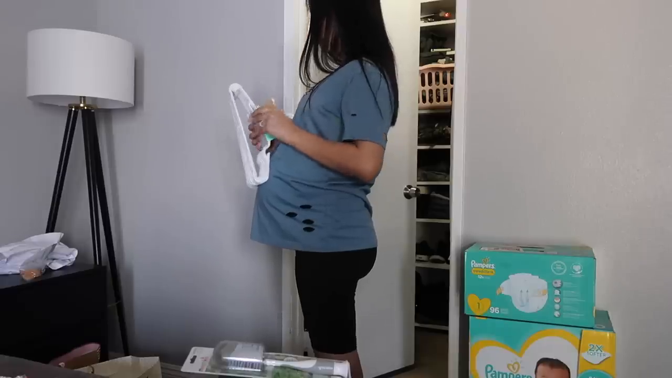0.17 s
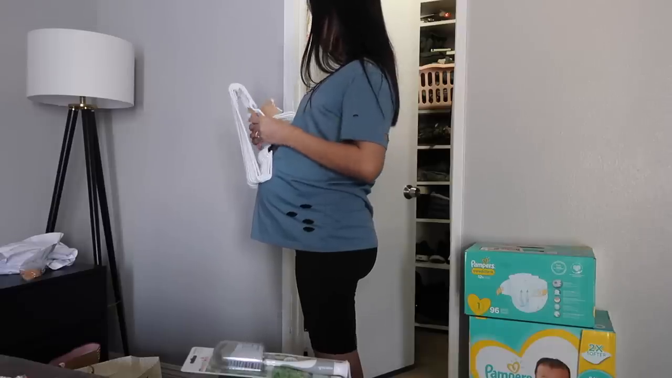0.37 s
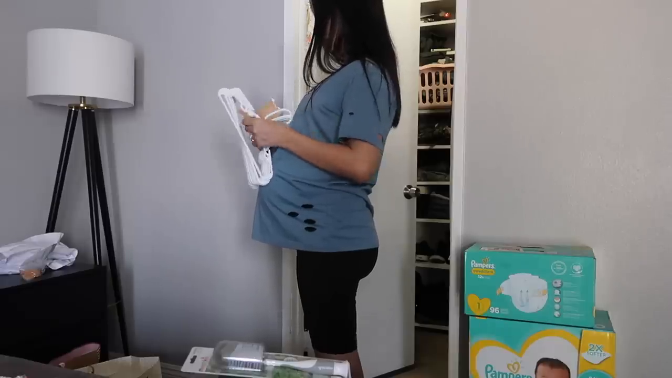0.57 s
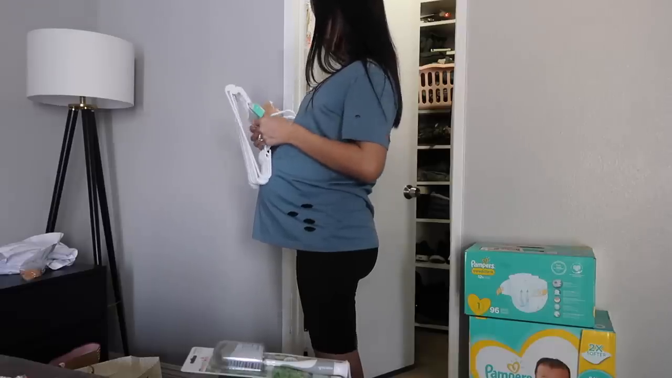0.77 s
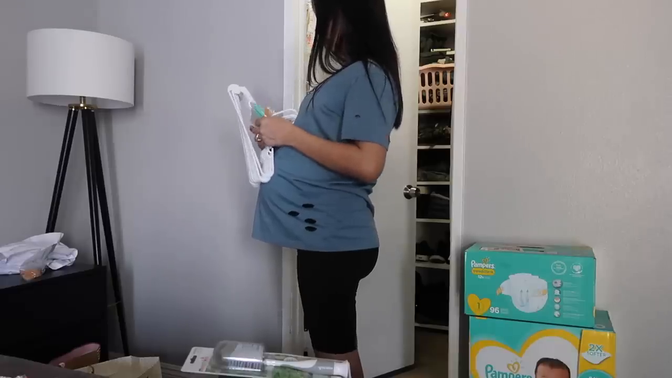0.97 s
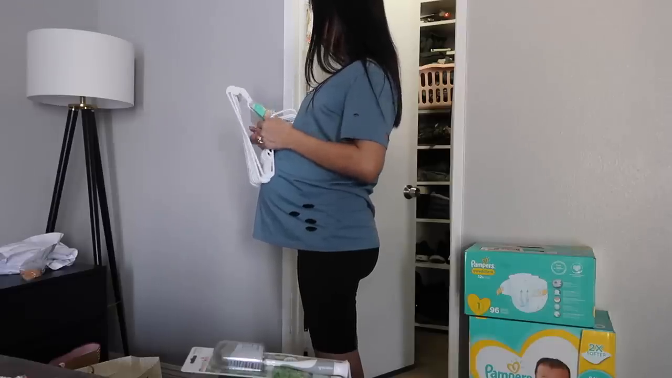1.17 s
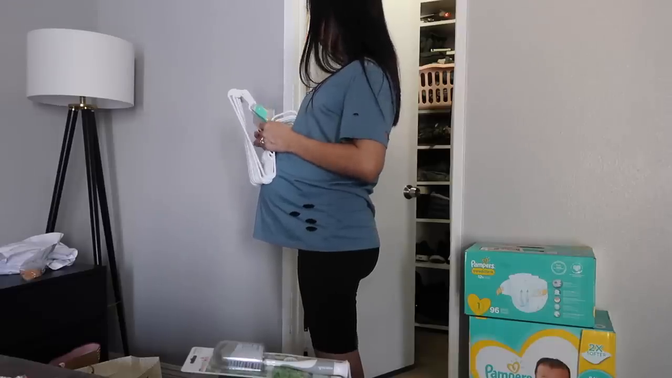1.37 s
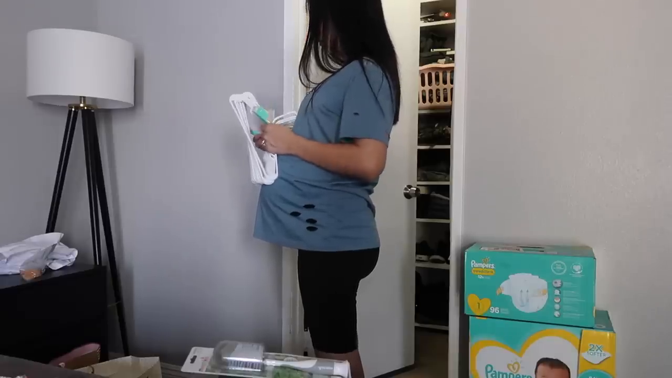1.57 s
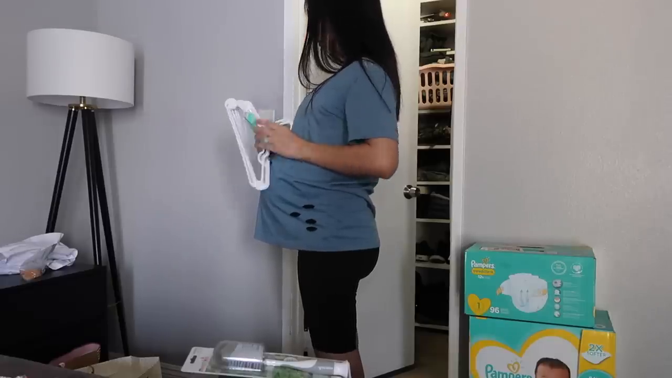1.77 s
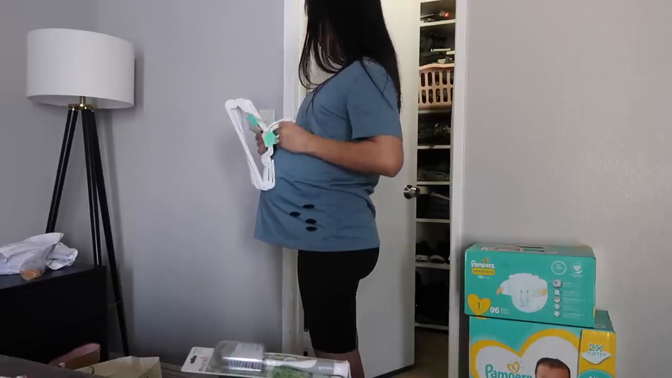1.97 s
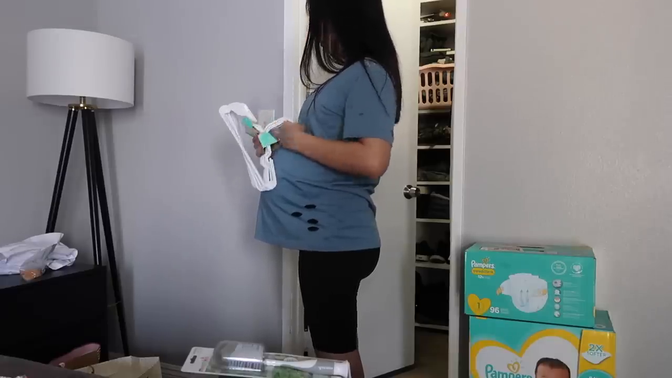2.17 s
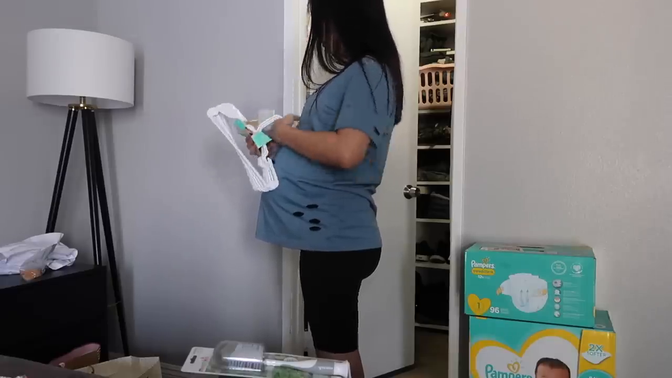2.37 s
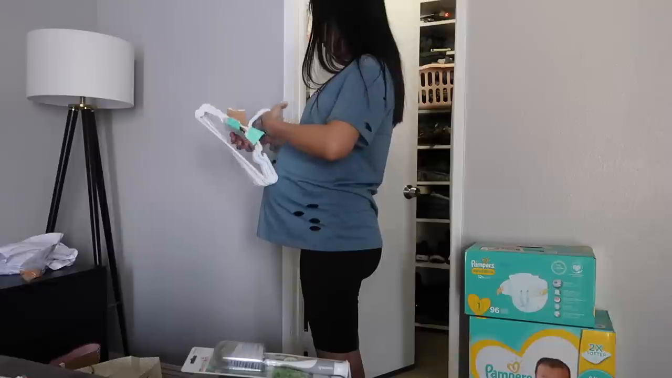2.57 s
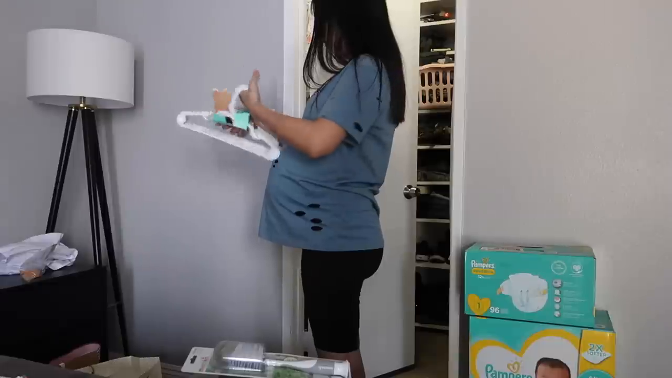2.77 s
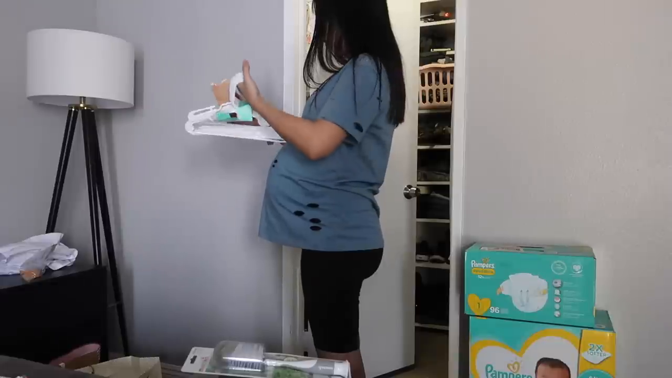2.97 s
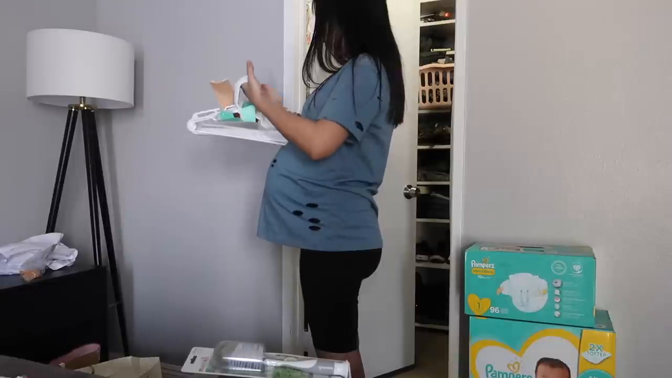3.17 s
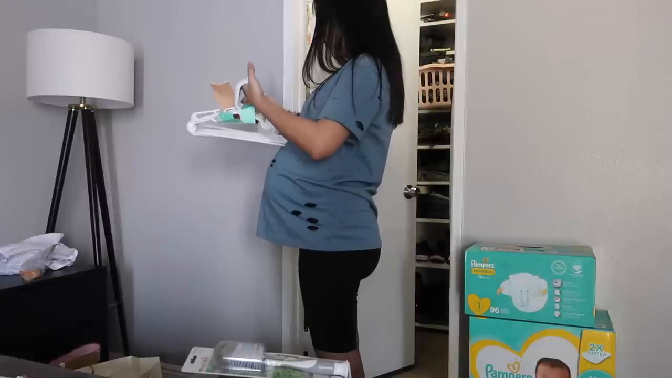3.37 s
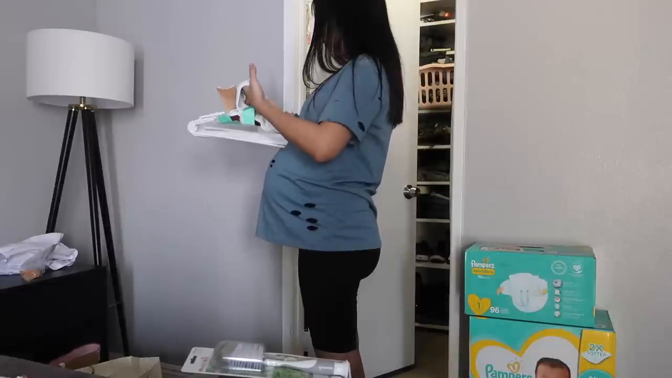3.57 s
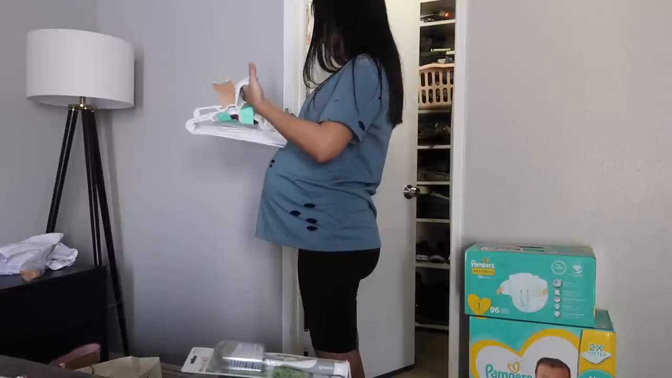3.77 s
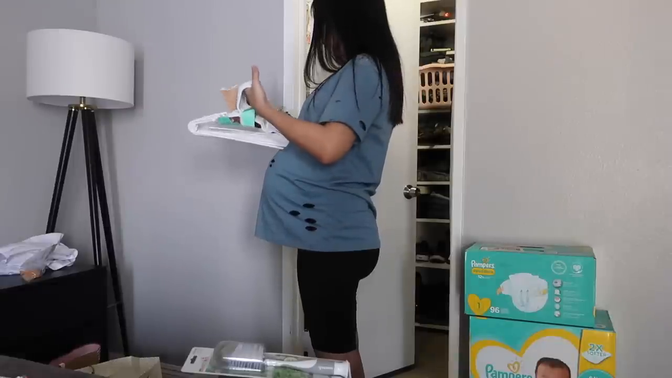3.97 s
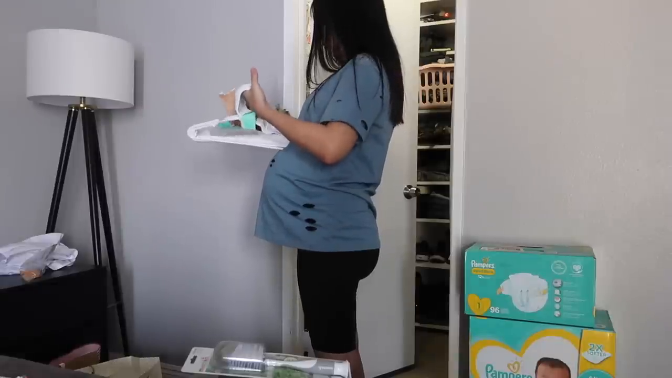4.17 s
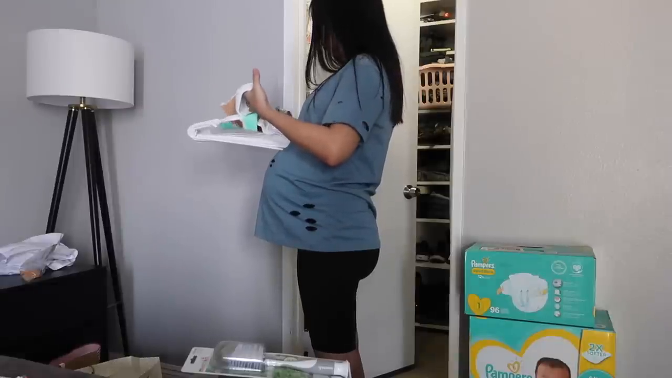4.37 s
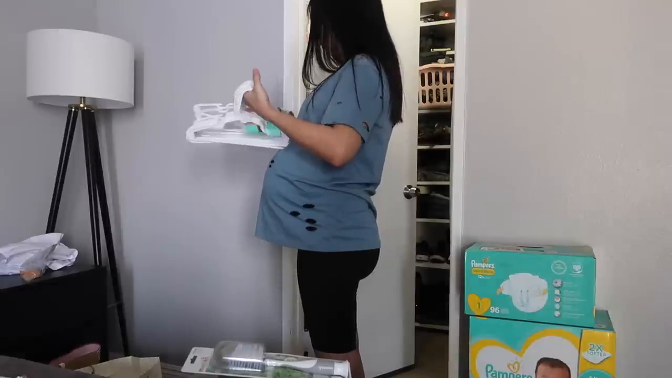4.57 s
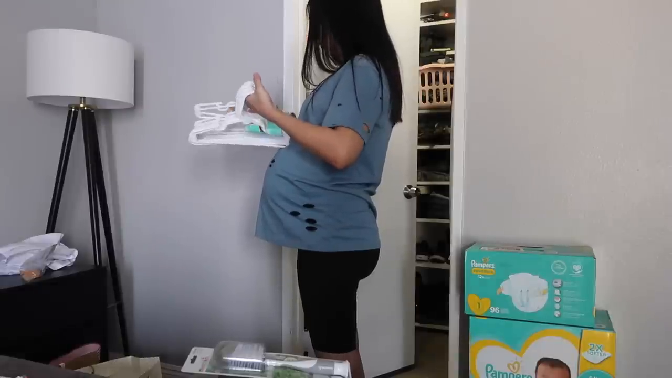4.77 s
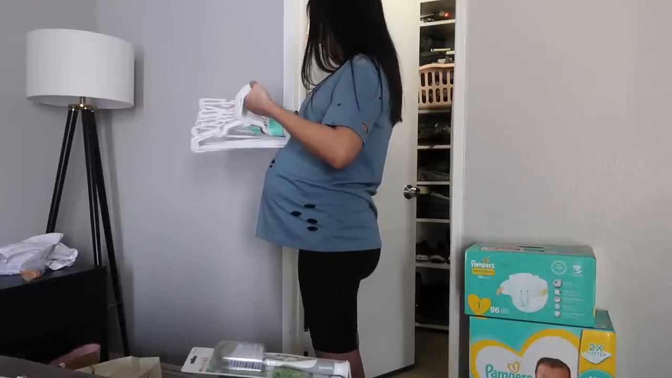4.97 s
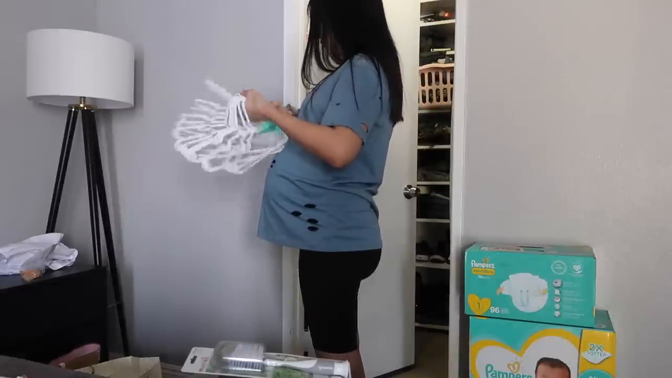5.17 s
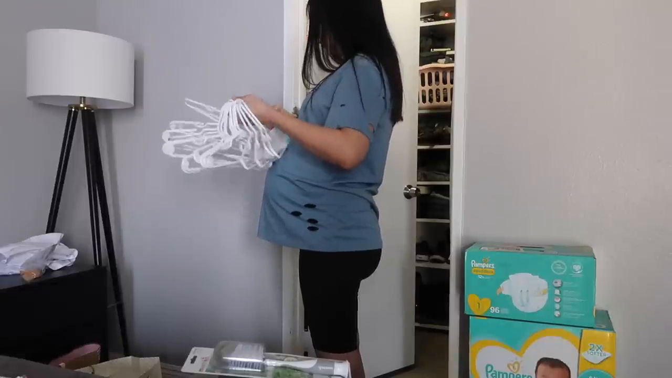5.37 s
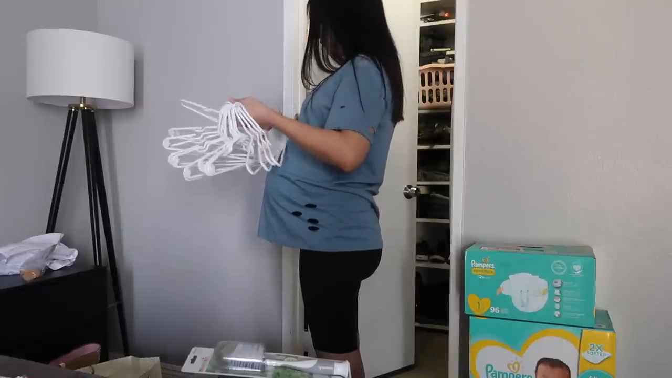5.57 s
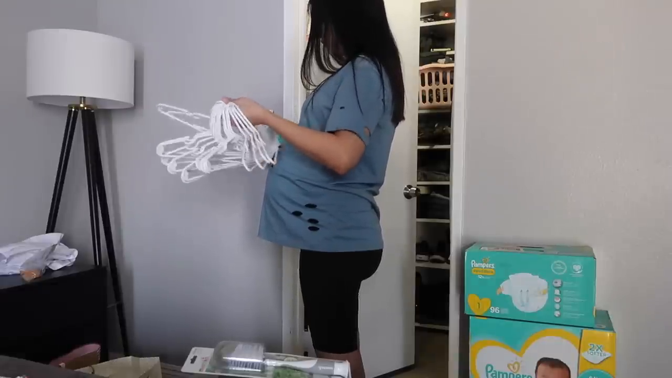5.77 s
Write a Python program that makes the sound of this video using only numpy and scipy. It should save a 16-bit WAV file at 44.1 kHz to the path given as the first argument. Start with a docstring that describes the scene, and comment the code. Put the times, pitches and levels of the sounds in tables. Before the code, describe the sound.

Plastic hangers knock together in short, bright, irregular clacks, with faint ticking and rubbing between them as hands shift the bundle. After two sharp clacks spaced apart, the hangers spill against each other in a brief clatter, the loudest moment. The sound comes from a few metres away in a room with little echo and a steady, low ventilation hum.

```python
"""Clattering plastic clothes hangers

A bundle of plastic hangers is handled a few metres away in a furnished room. Each knock sets
a hanger's frame ringing briefly; sliding makes a rattle of tiny ticks. At the end the bundle
fans out with a clatter. Ventilation rumbles below. Two close microphones hear the treble
mostly out of phase: one signal goes up as the other goes down."""
import sys
import numpy as np
from scipy import signal
from scipy.fft import rfft, irfft, next_fast_len
from scipy.io import wavfile

SR = 44100
rng = np.random.default_rng(int(sys.argv[2]) if len(sys.argv) > 2 else 0)


def wav_record(signal):
    """Record a signal, one row per channel, as 16-bit PCM in the file named by sys.argv[1]."""
    frames = np.transpose(np.atleast_2d(signal))
    bounded = np.clip(frames, -1, 1)
    # unit amplitude maps onto the largest positive 16-bit level
    quanta = np.round(bounded * 32767).astype(np.int16)
    wavfile.write(sys.argv[1], SR, quanta)


N = 256024

HANGER_TUNINGS = [.955, 1.0, 1.045]   # pitch ratios of three slightly unlike hangers
# The modes of a hanger, the tones its frame rings at: pitch_hz, level_db, ring_s (time to fade 60 dB)
HANGER_MODES = [(225, -14, 0.013), (312.5, -14, 0.022), (392, -15.5, 0.019), (497, -13.5, 0.03),
                (625, -16, 0.059), (785, -12.5, 0.038), (953, -6.5, 0.026), (1169, -6.5, 0.022),
                (1367, -8.5, 0.023), (1572, -1, 0.012), (1860, 1.5, 0.0099), (2208, -2, 0.016),
                (2546, 0.5, 0.012), (2970, -3.5, 0.017), (3310, 3.5, 0.0041), (3598, -7.5, 0.017),
                (4120, -2.5, 0.0078), (4660, -3.5, 0.0044), (5310, -3.5, 0.0033), (6110, -10, 0.0043),
                (6840, -13, 0.0047), (7850, -9, 0.0024), (9330, -12, 0.0015), (12100, -21, 0.0018),
                (13300, -35, 0.0031)]
# Knocks between hangers: start_s, level_db, pitch_hz, second_pitch_hz, bass_db, treble_db, contact_ms
KNOCKS = [(.128, -31.5, 1410, 620, 11, 0, 3), (0.148, -36, 2840, 3400, -7, 19.5, 2.1),
          (0.213, -33, 2270, 3420, 5, -13, 2.8), (0.241, -9, 2450, 5170, -4, 5.5, 3.85),
          (.252, -12, 2480, 3360, 3.5, 18.5, 4.04), (.266, -6, 2560, 4630, -16, 5.5, 5.85),
          (.281, -27, 2330, 3680, 6, -2, 9.4), (0.297, -16, 2350, 3560, -8, 10, 4),
          (0.497, -34, 3120, 2200, -1, 13, 10.5), (0.575, -32, 2010, 3420, 10, -22, 5),
          (0.704, -29, 2400, 1240, 10.5, 15, 9.8), (0.894, -42, 3200, 3560, 10, 12, 1.06),
          (.954, -29, 2320, 4160, -2, 9, 11.6), (1.035, -36, 1700, 2500, 10.5, 5, 6),
          (1.076, -42, 3620, 4400, -7, 5, 2), (1.111, -43, 2900, 3900, -5, 5, 8),
          (1.178, -39, 2700, 3600, -5, 3, 6), (1.263, -37, 2880, 3860, -10, -5, 6),
          (1.307, -43, 3160, 3360, 6, 7, 6), (1.423, -31, 2700, 3600, -2, 1, 14),
          (1.453, -20, 2510, 3800, -20, 14, 16.7), (1.474, -20, 2530, 2900, -15, 8, 18),
          (1.506, -19.5, 2500, 1900, 4, 9, 5.5), (1.698, -37, 2500, 4290, -4, 7, 8.9),
          (1.734, -29.5, 2740, 4070, 3, 9, 8), (1.776, -30.5, 2830, 3840, 8, 21, 9.5),
          (1.81, -26, 2850, 4260, -21, -1, 3.2), (1.826, -19, 2880, 3600, 0, 14.5, 9.1),
          (1.869, -39, 1830, 7750, 22.5, 36.5, 6.3), (2.118, -41, 2680, 3600, -10, -8, 4.6),
          (2.207, -28.5, 2650, 3570, -6, -1, 2.9), (2.225, -41, 2110, 3620, -12, -5, 8),
          (2.294, -35.5, 2270, 3920, 7, 5, 3.6), (2.36, -34.5, 2670, 3940, -8, 8, 8.2),
          (2.419, -32, 1650, 4180, -16, 6, 7), (2.471, -30.5, 2600, 3650, -15, 3, 3.9),
          (2.616, -38.5, 2450, 3470, 1, 15, 5), (2.746, -35, 2300, 4100, 4, -2, 4.4),
          (2.878, -32, 2350, 3280, -2, 17.5, 6), (2.933, -38, 4470, 5600, -7, 24, 0.84),
          (2.985, -25, 2310, 2300, -12, -8, 2.1), (2.996, -8.5, 2220, 2230, 10.5, -5, 2.83),
          (3.003, -10.5, 1680, 393, 2.5, -24, 7), (3.069, -25.5, 2570, 2600, -15, 6, 11),
          (3.364, -32.5, 2380, 3200, -11, -4, 0.96), (3.379, -33, 2300, 3470, -6, 17, 4),
          (3.412, -35.5, 2400, 4280, 13, 20, 1.13), (3.434, -34, 2300, 3500, 7.5, 16, 5),
          (3.56, -30, 1780, 3330, -12, 7, 5.6), (3.634, -26.5, 2190, 780, 6, 0, 3.25),
          (3.723, -32, 2230, 3900, -12, 13, 4.9), (3.769, -24, 2580, 3380, -19, -7, 5),
          (3.776, -18.5, 2670, 4250, 6, -1, 1.46), (3.848, -41, 2630, 5700, 8, 29.5, 1.55),
          (3.944, -29.5, 2730, 3460, -12, -3, 5), (3.981, -33, 2300, 4140, 8.5, 4, 4.4),
          (4.045, -38, 2350, 3000, -12, 14, 3.6), (4.1, -38.5, 2460, 2450, -15, -8, 10.4),
          (4.15, -44, 2600, 2600, -12, -5, 8), (4.18, -32, 2360, 3550, -5, 5, 9),
          (4.229, -28, 1220, 4240, 2, -24, 5.5), (4.282, -36, 2450, 3670, 0, 24.5, 4.1),
          (4.397, -39, 1980, 3530, 10, 15, 5.6), (4.49, -23, 2090, 3520, -10, 7, 6),
          (4.578, -25, 3100, 3100, -10, -5, 9.6), (4.594, -15, 2530, 2480, -2, -13, 6),
          (4.6042, -1, 1460, 3950, 0, -6, .5), (4.6049, -3, 4130, 2530, -2, -16, 0.37),
          (4.643, -21, 1570, 4080, -1, 20.5, 6.8), (4.675, -18, 1450, 6860, -4, 14, 5),
          (4.739, -26.5, 1580, 6960, -7, 20, 6), (4.815, -35, 3020, 4200, -15, 19, 4),
          (4.828, -20.5, 2620, 4330, -40, 11.5, 2.3), (4.973, -25.5, 2460, 3870, -3, 8, 3.9),
          (5.042, -20, 2450, 7000, 11, 6, 7.1), (5.051, -16, 1900, 3600, 7.5, -12, 14),
          (5.158, -13, 2600, 3450, 9, 13, 6.2), (5.169, 1, 2680, 4150, 3, -6, 8.4),
          (5.179, -10.5, 1900, 4060, 6, 1, 7.6), (5.216, -6.5, 1530, 4160, 5.5, 9, 11.9),
          (5.238, -8, 2600, 4200, 5, 8, 9.3), (5.277, -5, 2740, 4450, 6.5, 11.5, 2.65),
          (5.287, -7.5, 2800, 4150, 5, 4, 5.1), (5.301, -11, 2610, 3800, 1, -4, 5.3),
          (5.309, -9, 1920, 4740, 11.5, 12, 6.74), (5.328, -11, 1980, 3470, 6.5, 0, 8.2),
          (5.443, -12, 670, 2960, 5.5, 6, 5.5), (5.459, -27.5, 2250, 3350, 11, -2, 6),
          (5.503, -6.5, 2950, 3900, -1, -2.5, 3.77), (5.503, -18, 715, 3000, -5, -16, 5.8),
          (5.516, -10.5, 770, 2210, 5, -1, 7.6), (5.53, -20, 633, 2220, 6, 6, 5.8),
          (5.569, -10.5, 2690, 790, 5.5, 0.5, 7.9), (5.579, -10.5, 1990, 2940, -4, -18, 8)]


def clacks(hanger, touches=4, grip=.65):
    """Every third knock rings this hanger; long contacts chatter. Returns the ringing and a dry crack."""
    own_knocks = np.transpose(KNOCKS[hanger::len(HANGER_TUNINGS)])
    start_s, level_db, pitch_hz, second_hz, bass_db, treble_db, contact_ms = own_knocks
    luck = rng.standard_normal((len(start_s), 1 + touches, len(HANGER_MODES)))
    touch = np.arange(touches)
    spacing = (touch + rng.uniform(-.4, .4, (len(start_s), touches))) * (touch > 0) / (touches - 1)
    starts = ((start_s[:, None] + contact_ms[:, None] / 1000 * spacing) * SR).astype(int)
    share = np.where(touch > 0, np.clip(contact_ms / 5, 0, 1)[:, None], 1)   # brief: mostly one touch
    share = share / np.sqrt(np.sum(share ** 2, axis=1, keepdims=True))
    ringing = np.zeros(N)
    for k, (hz, mode_db, ring_s) in enumerate(HANGER_MODES):
        hz *= HANGER_TUNINGS[hanger]
        knock_db = level_db + mode_db - 12 + 1.33 * luck[:, 0, k]
        knock_db += contact_tone_db(hz, pitch_hz, bass_db, treble_db, boost_db=9.5)
        knock_db += 8.9 * np.exp(-(np.log2(hz / second_hz) / .18) ** 2)
        # the briefest knocks sound hollow: modes away from their two pitches drop
        octaves_away = np.minimum(np.abs(np.log2(hz / pitch_hz)), np.abs(np.log2(hz / second_hz)))
        knock_db -= 12 * np.exp(-(contact_ms / .8) ** 4) * np.clip(octaves_away / .15, 0, 1)
        knock_db += .56 * bass_db * np.clip(np.log2(700 / hz), 0, 1)   # thud: the whole bundle moves
        clicks = np.zeros(N)
        np.add.at(clicks, starts, from_db(knock_db)[:, None] * share * np.sign(luck[:, 1:, k]))
        ringing += blunt_ring(clicks, hz, grip * ring_s)   # the hands shorten the ring
    tips = np.zeros(N)
    np.add.at(tips, starts, share * from_db(level_db + .52 * treble_db - contact_ms - 23)[:, None])
    fade = np.exp(-1 / (.00072 * SR))
    crack = signal.lfilter([1], [1, -fade], tips) * rng.standard_normal(N)
    return ringing, keep_band(crack + 1e-18, 3000, 10900)


# Slides and shakes of the bundle: peak_s, rise_s, fall_s, level_db, pitch_hz, bass_db, treble_db
SLIDES = [(.08, 0.27, 0.11, -59, 1840, 7, -13), (0.244, 0.017, 0.087, -25.5, 2380, 12, 10),
          (.37, 0.12, 0.13, -41, 2210, -18, 6), (.52, 0.065, 0.04, -53, 3250, -14, 0),
          (.72, 0.095, 0.018, -39.5, 2300, 0, -9), (1.31, 0.15, 0.056, -43, 2850, -24, 13),
          (1.48, 0.065, 0.061, -28, 2480, -9, 13.5), (1.515, 0.11, 0.092, -30.5, 2300, 8.5, 4),
          (1.71, 0.1, 0.21, -37, 2820, -10, 10.5), (1.839, 0.045, 0.13, -26.5, 1920, 8, 12),
          (2.15, 0.045, 0.049, -41.5, 2600, -6, 0), (2.39, 0.16, 0.074, -41.5, 2650, -14, 3),
          (2.63, 0.05, 0.068, -58, 2420, -15, 4), (2.74, 0.12, 0.042, -42.5, 2530, -24, 11.5),
          (2.895, 0.083, 0.16, -43.5, 2280, -3, 22), (3.004, 0.013, 0.1, -28.5, 1500, -2, 4.5),
          (3.075, 0.044, 0.092, -32, 1890, 4.5, -7), (3.58, 0.16, 0.33, -39.5, 2030, -4, -12),
          (3.775, 0.033, 0.13, -39, 2230, 14, 15.5), (3.96, 0.14, 0.13, -48, 2600, -11, 14.5),
          (4.19, 0.22, 0.073, -45, 2420, -8, 11), (4.29, 0.12, 0.069, -40.5, 2460, 0, 4),
          (4.46, 0.11, 0.22, -35, 2030, 0, 5), (4.618, 0.068, 0.13, -20, 1750, 3, 11),
          (5.036, 0.063, 0.0081, -35.5, 2360, -10, 26), (5.169, 0.015, 0.15, -13.5, 2600, 3.5, 7),
          (5.267, 0.025, 0.088, -18.5, 2600, 5, -4), (5.339, 0.27, 0.13, -22.5, 2030, 3.5, 12.5),
          (5.46, 0.089, 0.026, -25, 2250, 12, 6), (5.509, 0.0072, 0.036, -15.5, 2000, 10, 5),
          (5.63, 0.059, 0.12, -27.5, 860, -1, -1.5)]
# Fingers keep the bundle ticking faintly: time_s, level_db, pitch_hz
FINGERS = [(0, -46, 2260), (.2, -47, 2290), (.52, -48, 3200), (.65, -51, 2130), (.85, -49, 3030),
           (1.1, -45, 2600), (1.3, -51, 3040), (1.6, -56.5, 2400), (2.05, -62, 2400), (2.15, -52.5, 2600),
           (2.55, -49.5, 2500), (2.95, -48.5, 2400), (3.2, -59, 1900), (3.4, -50.5, 3180),
           (3.7, -50.5, 1900), (3.88, -49, 3000), (4.05, -52.5, 2800), (4.35, -45.5, 3000),
           (4.7, -59, 1700), (4.9, -54, 2320), (5.1, -44, 2300), (5.8, -50.5, 1900)]


def rattle(hanger, ticks_per_s=500, spread_db=3):
    """Plastic rubs on plastic in dense, uneven ticks, each reaching the modes differently."""
    t = np.arange(N) / SR
    peak_s, rise_s, fall_s, level_db, pitch_hz, bass_db, treble_db = np.transpose(SLIDES)
    after_s = t - peak_s[:, None]
    drop_db = 20 * np.maximum(-after_s / rise_s[:, None], after_s / fall_s[:, None])
    slides = from_db(level_db[:, None] - drop_db)
    finger_s, finger_db, finger_hz = np.transpose(FINGERS)
    ticks = rng.random(N) < ticks_per_s / SR
    ticks = unit_level(ticks * from_db(spread_db * np.minimum(rng.exponential(1, N), 4)))
    shifts_s = np.arange(0, N / SR + 1, .05)   # the grip keeps shifting
    out = np.zeros(N)
    for hz, mode_db, ring_s in HANGER_MODES:
        grip_db = 5 * np.interp(t, shifts_s, rng.standard_normal(len(shifts_s)))
        fidget_db = finger_db + contact_tone_db(hz, finger_hz, bass_db=7, treble_db=8, boost_db=6)
        force = from_db(contact_tone_db(hz, pitch_hz, bass_db, treble_db, boost_db=8)) @ slides
        force += from_db(grip_db + np.interp(t, finger_s, fidget_db))
        clicks = ticks * rng.standard_normal(N) * force * from_db(mode_db - 39)
        out += blunt_ring(clicks, hz * HANGER_TUNINGS[hanger], ring_s)
    return out


def contact_tone_db(hz, pitch_hz, bass_db, treble_db, boost_db):
    """Modes near a contact's pitch ring most; heavy contacts reach low modes, sharp ones the high."""
    near = boost_db * np.exp(-(np.log2(hz / pitch_hz) / .27) ** 2)
    bass = bass_db * np.clip(np.log2(1600 / hz), 0, 1)
    treble = treble_db * np.clip(np.log2(hz / 3200), 0, 1)
    return near + bass + treble


def blunt_ring(clicks, hz, ring_s):
    """After a blunt contact, a mode swells for a moment before it dies."""
    rise_s = 6.2 / hz + .00073
    return ring(ring(clicks, hz, rise_s), hz, ring_s) * 2 * np.log(1000) / (rise_s * SR)


def ring(clicks, hz, ring_s):
    """Each click starts a pure tone that fades by 60 dB in ring_s."""
    fade, turn = from_db(-60 / (ring_s * SR)), 2 * np.pi * hz / SR
    return signal.lfilter([0, np.sin(turn)], [1, -2 * fade * np.cos(turn), fade * fade], clicks + 1e-18)


# How long the room's echoes take to fade by 60 dB: pitch_hz, fade_s
ROOM_FADE = [(200, 0.27), (600, 0.36), (1400, 0.25), (3700, 0.16), (10000, 0.2)]


def room(sound, build_s):
    """Echoes blur into noise that builds up, then dies away octave by octave."""
    t = np.arange(SR // 2) / SR
    tail = 0
    for low_hz in 90 * 2 ** np.arange(8):
        band = keep_band(rng.standard_normal(len(t)), low_hz, min(2 * low_hz, .45 * SR))
        tail += band * from_db(-60 * t / at_hz(ROOM_FADE, low_hz * np.sqrt(2)))
    tail *= 1 - np.exp(-(t / build_s) ** 2)
    return signal.fftconvolve(sound, tail / np.sqrt(np.sum(tail ** 2)))[:N]


# Air noise that is the same at both microphones (mid): pitch_hz, level_db
AIR_MID = [(15, -1), (30, -2), (39, -26), (47, 2.5), (60, -3), (120, 0), (200, -6.5), (400, -9.5),
           (700, -25.5), (1500, -21), (2500, -36), (4000, -27.5), (8000, -36.5), (12000, -42), (14500, -59)]
# Air noise that is opposite at the two microphones (side): pitch_hz, level_db
AIR_SIDE = [(13, -66), (22, -52), (128, -7), (409, -1.5), (653, -8.5), (1410, -11), (2590, -17),
            (4260, -19.5), (12800, -34), (14300, -41), (16000, -51)]


def ventilation(hum_hz=126, hum_width_hz=24, whine_hz=13040):
    """Moving air rumbles, with a wavering motor hum and a thin whine. Returns mid and side."""
    hum_ring_s = np.log(1000) / (np.pi * hum_width_hz)
    hum = unit_level(ring(rng.standard_normal(N), hum_hz, hum_ring_s))
    whine = np.sqrt(2) * np.sin(2 * np.pi * whine_hz * np.arange(N) / SR)
    mid = from_db(-52.5) * unit_level(shape_tone(rng.standard_normal(N), AIR_MID))
    side = from_db(-58) * unit_level(shape_tone(rng.standard_normal(N), AIR_SIDE))
    mid += from_db(-52) * hum + from_db(-82.5) * whine
    side += from_db(-88) * np.roll(whine, 1)
    return mid, side


def from_db(db):
    """Turns decibels into a multiplier."""
    return 10 ** (np.asarray(db) / 20)


def unit_level(sound):
    """Scales a sound to an average power of 1."""
    return sound / np.sqrt(np.mean(sound ** 2) + 1e-20)


def at_hz(table, hz):
    """Reads between a table's rows, on a scale of octaves."""
    pitches_hz, values = np.transpose(table)
    return np.interp(np.log(hz + 1), np.log(pitches_hz + 1), values)


def shape_tone(sound, table):
    """Turns each pitch up or down by a table of pitch_hz, level_db."""
    size = next_fast_len(N)
    hz = np.arange(size // 2 + 1) * SR / size
    return irfft(rfft(sound, size) * from_db(at_hz(table, hz)), size)[:N]


def keep_band(sound, low_hz, high_hz):
    """Softens everything outside a range of pitches."""
    return signal.sosfilt(signal.butter(2, [low_hz, high_hz], "band", fs=SR, output="sos"), sound)


# How strongly the hangers' sound differs between the two microphones: pitch_hz, level_db
MIC_DIFFERENCE = [(60, -24), (110, -34), (200, -32), (380, -26), (700, -30), (1290, -22.5), (2380, -26),
                  (4400, -7.5), (8120, -1), (15000, 11)]


def scene():
    """Three hangers, their echoes and the ventilation reach two close microphones."""
    hangers, side_echoes = 0, 0
    shade = signal.butter(2, 4500, fs=SR, output="sos")   # hands and body block the direct treble
    for hanger in range(len(HANGER_TUNINGS)):   # each sits elsewhere and has its own echoes
        ringing, crack = clacks(hanger)
        ringing += rattle(hanger)
        direct = signal.sosfilt(shade, ringing) + crack
        hangers += direct + from_db(-2.5) * room(ringing + crack, build_s=.005)
        side_echoes += room(ringing + crack, build_s=.012)
    # the microphones differ by the same sound a quarter cycle ahead (left is nearer) and other echoes
    ahead = -np.imag(signal.hilbert(hangers, next_fast_len(N)))[:N]
    mid, side = ventilation()
    mid += hangers
    side += shape_tone(.99 * ahead + side_echoes, MIC_DIFFERENCE)
    return np.array([mid + side, mid - side]) * from_db([[.15], [-.15]])


def record(dry, cutoff_hz=16300):
    """Cuts off the very highest treble."""
    return signal.sosfilt(signal.cheby2(12, 70, cutoff_hz, fs=SR, output="sos"), dry)


dry = scene()
out = record(dry)
wav_record(out)
```